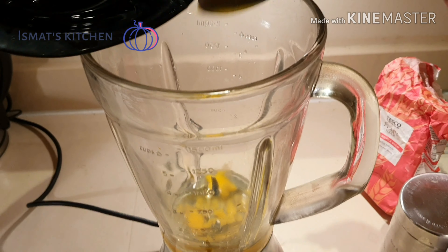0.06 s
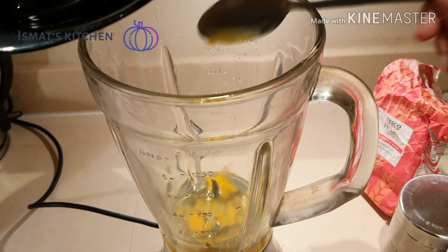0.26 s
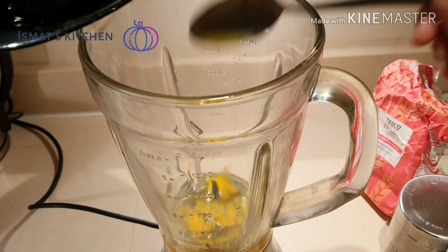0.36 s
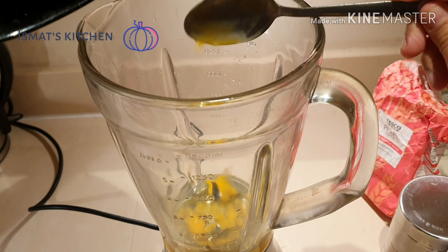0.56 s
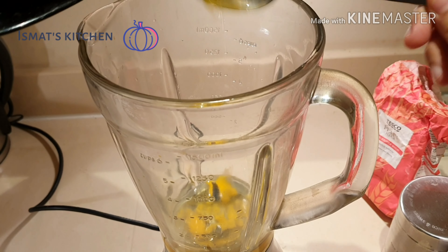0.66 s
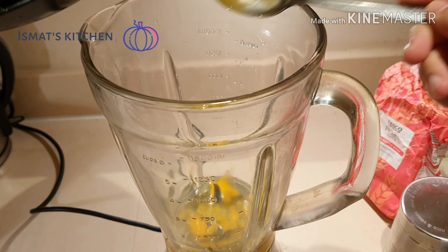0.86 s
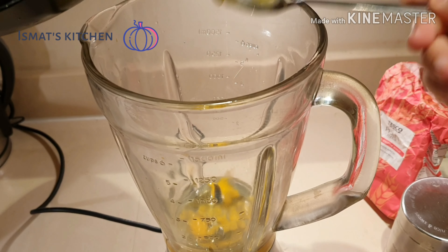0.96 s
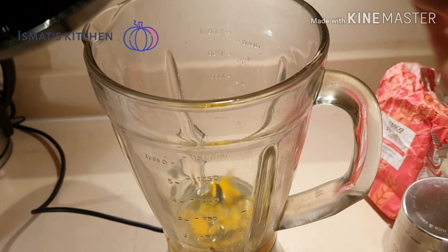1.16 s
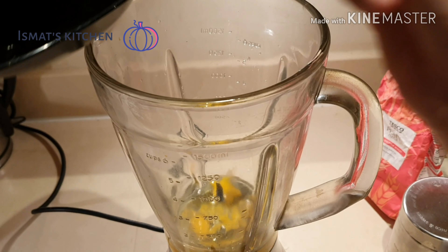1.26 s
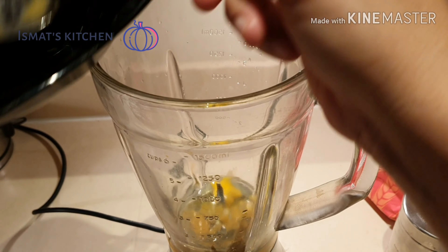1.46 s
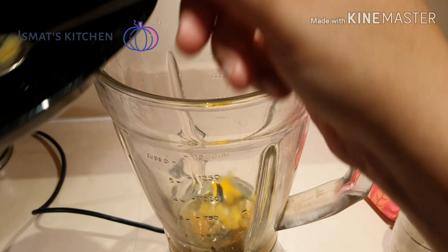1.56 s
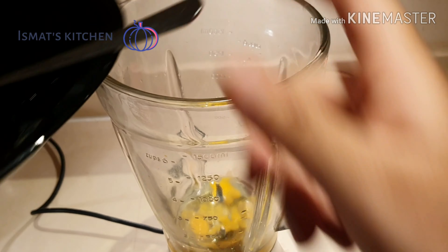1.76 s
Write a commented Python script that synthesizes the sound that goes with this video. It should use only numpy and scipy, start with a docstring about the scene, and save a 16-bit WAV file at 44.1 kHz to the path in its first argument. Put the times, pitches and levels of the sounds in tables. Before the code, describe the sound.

A metal spoon taps a glass blender jar rim four times, then a bowl clinks lightly twice

```python
"""A small hard kitchen: a spoon taps the rim of a glass blender jar four times, then touches a bowl twice.
Glass and bowl are banks of dying sines with beating twins, over a bright crack and clatter of shaped noise.
A low pop of the air in the jar and a thump of the counter sit under each contact, bowl included.
Behind them lie room air, an appliance's hum, two hand ticks and a faint whistle as the spoon is drawn off."""
import sys
import numpy as np
from scipy import signal
from scipy.fft import rfft, irfft
from scipy.io import wavfile
from scipy.ndimage import uniform_filter1d

SR = 44100
rng = np.random.default_rng(int(sys.argv[2]) if len(sys.argv) > 2 else 0)


def materialize(psi):
    """Save the field psi as 16-bit PCM at rate SR to the path in sys.argv[1].

    A 1-D psi becomes a single channel; in a 2-D psi each row is a channel.
    """
    bounded = np.clip(np.atleast_2d(psi).T, -1, 1)
    quanta = np.round(bounded * 32767).astype(np.int16)
    wavfile.write(sys.argv[1], SR, quanta)


def volts_from_db(level):
    """Convert decibel levels to linear amplitude ratios."""
    exponent = np.asarray(level, float) / 20
    return 10 ** exponent


N = 79380
LEAD = SR // 10  # samples kept ahead of the start, for contacts whose tails are already sounding


def evened(x):
    """Scales to rms 1."""
    return x / np.sqrt(np.mean(x ** 2) + 1e-20)


def read(points, hz):
    """Reads a table on a log-frequency axis."""
    f, value = np.transpose(points)
    return np.interp(np.log(hz + 1), np.log(f + 1), value)


def tilt(hz, slope_db):
    """Gain of a slope in dB per octave about 3 kHz, flat below 500 Hz."""
    return volts_from_db(slope_db * np.log2(np.clip(hz, 500, None) / 3000))


def add(mix, s, sound):
    """Mixes a sound in at time s."""
    part = mix[:, LEAD + round(s * SR):][:, :sound.shape[-1]]
    part += sound[..., :part.shape[1]]


def blend(a, b, same):
    """Left and right spectra with a given likeness, from two independent ones."""
    return np.array([a, same * a + np.sqrt(1 - same ** 2) * b])


def noise(spectrum, same, count, slope_db=0):
    """Two channels of coloured noise at rms 1; same(hz) is their likeness."""
    hz = np.fft.rfftfreq(count, 1 / SR)
    a, b = rfft(rng.standard_normal((2, count)), axis=1)
    colour = volts_from_db(read(spectrum, hz)) * tilt(hz, slope_db)
    return evened(irfft(blend(a, b, np.clip(same(hz), -1, 1)) * colour, count))


def fuzzy(hz, width_hz, steady):
    """A tone at rms 1 whose height and phase wander: a steady part plus slow complex noise."""
    r = np.exp(-np.pi * width_hz / SR)
    wander = rng.standard_normal((N + SR, 2)) @ [1, 1j]
    for _ in range(2):
        wander = signal.lfilter([1], [1, -r], wander)
    wander = wander[SR:]  # the filters have settled
    carrier = np.exp(2j * np.pi * np.cumsum(hz * np.ones(N)) / SR)
    return evened(((steady + wander / wander.std()) * carrier).real)


def room_air():
    """The still room: broadband noise, strongest in the bass, unlike in the two channels in some bands."""
    # room air colour: f/Hz, relative level/dB
    air = [(15, -44.5), (30, -23), (50, -4.5), (70, -22.5), (100, -15), (160, -14.5), (300, -16.5),
           (560, -16), (1000, -20), (1500, -26), (2500, -34), (10000, -38.5), (15500, -44), (17000, -60.5)]
    # left-right likeness of the air: f/Hz, likeness (1 = alike)
    likeness = [(60, 0.92), (180, 0.34), (550, 1), (1650, 0.11), (4970, 0.46), (15000, 1)]
    return volts_from_db(-61.5) * noise(air, lambda hz: read(likeness, hz), count=N)


def hum():
    """An appliance: narrow, nearly steady lines, the same in both channels."""
    # hum lines: f/Hz, level/dB rms
    lines = [(50, -72), (100, -70), (355, -60.5), (947, -72)]
    return sum(volts_from_db(db) * fuzzy(hz, width_hz=1.1, steady=9) for hz, db in lines)


def whistle():
    """A faint fuzzy whistle as the spoon is drawn off: one wandering tone gliding in pitch and level."""
    # whistle path: t/s, f/Hz, level/dB rms
    path = [(0.94, 1404, -61), (0.991, 1494, -59), (1.04, 1429, -62.5), (1.09, 1480, -62),
            (1.2, 1480, -75.5)]
    t, (s, hz, db) = np.arange(N) / SR, np.transpose(path)
    tone = fuzzy(np.interp(t, s, hz), width_hz=160, steady=.5)
    return volts_from_db(np.interp(t, s, db, -140, -140)) * tone


def tick(treble_db, knock_db):
    """A thin click of dying high-passed noise, and a dull knock: a dying sine just after it."""
    click_hz, click_t60_s = 5000, 0.0096
    knock_hz, knock_t60_s, knock_after_s = 262, 0.024, 0.0012
    t = np.arange(SR // 10) / SR
    high_pass = signal.butter(1, click_hz, "high", fs=SR)
    click = signal.lfilter(*high_pass, rng.standard_normal(len(t)))
    click *= volts_from_db(treble_db - 60 * t / click_t60_s) * np.minimum(t / .001, 1)
    late = np.maximum(t - knock_after_s, 0)
    knock = np.sin(2 * np.pi * knock_hz * late) * volts_from_db(knock_db - 60 * late / knock_t60_s)
    return click, knock


def hand_ticks():
    """Small ticks of a hand, as ring, rest and low mixes; the ring mix stays empty."""
    # ticks: t/s, treble level/dB, knock level/dB
    ticks = [(0.1152, -43.5, -37.5), (1.402, -51.5, -74)]
    mixes = np.zeros((3, 2, N + LEAD))
    for s, *levels in ticks:
        click, knock = tick(*levels)
        add(mixes[1], s, click)
        add(mixes[2], s, knock)
    return mixes


def rings(modes, rise_s, slope_db=0, after=0, count=SR, next_s=np.inf):
    """Sines (f/Hz, level/dB, t60/s, left-right/dB, left leads/rad) that start from rest and die."""
    scatter_db = 1  # random spread of each mode's level
    twin_db, twin_split, twin_start = -18.5, 0.001, 2.5  # dB, share of f higher, radians
    damp_hz, damp_db, damp_s = 2600, -9.5, 0.007  # the next contact chokes the upper modes
    hz, db, t60, pan_db, lead = np.transpose(modes)
    clock = np.arange(count) / SR
    t = np.maximum(clock - after, 0)
    size = np.sqrt(2) * volts_from_db(db + scatter_db * rng.standard_normal(hz.shape)) * tilt(hz, slope_db)
    ports = np.array([size * volts_from_db(side * pan_db / 2) * np.exp(.5j * side * lead) for side in (1, -1)])
    swing = np.exp((2j * np.pi * hz - np.log(1000) / t60)[:, None] * t) * (1 - np.exp(-t / rise_s))
    # a weaker twin a little higher makes each mode swell and beat
    swing *= 1 + volts_from_db(twin_db) * np.exp(1j * (2 * np.pi * twin_split * hz[:, None] * t + twin_start))
    swing[hz > damp_hz] *= volts_from_db(damp_db * np.clip((clock - next_s) / damp_s, 0, 1))
    return (ports @ swing).imag


def thump(count):
    """The counter under a contact: a few low modes, each arriving a little late."""
    # counter modes: f/Hz, relative level/dB, t60/s, arrives after t/s
    counter = np.array([(57.58, -4, 0.36, .032), (95, -4.5, 0.14, .012), (111.18, -3, 0.052, .036),
                        (139, -5.5, 0.075, 0.0033)])
    modes = [(*mode[:3], .8, .15) for mode in counter]
    return rings(modes, rise_s=0.0057, after=counter[:, 3:], count=count)


def pop(count):
    """The air in the jar: a low, slowly starting, soon dying group of resonances."""
    # air modes: f/Hz, relative level/dB, t60/s
    air_modes = [(393, -1.5, .09), (426, -16.5, 0.13), (446.7, 6.5, 0.07), (469.6, -13.5, 0.34),
                 (230, -10, 0.062)]
    return rings([(*mode, -2.5, .3) for mode in air_modes], rise_s=0.0084, count=count)


def patchy(spectrum):
    """Gives a smooth spectrum random narrow peaks and valleys."""
    patch_db, patch_hz, grid_hz = 6.5, 115.5, 20
    hz = np.arange(20, SR / 2, grid_hz)
    rough = uniform_filter1d(rng.standard_normal(len(hz)), max(round(patch_hz / grid_hz), 1))
    return np.c_[hz, read(spectrum, hz) + patch_db * evened(rough)]


def clatter_noise(spectrum, slope_db):
    """Many weak short modes heard as noise: a brighter, shorter crack over a longer clatter."""
    rise_s, crack_t60_s, clatter_t60_s, clatter_db = 0.000095, 0.019, 0.12, 1  # dB against the crack
    crack_tilt_db = 23  # per octave brighter than the clatter
    t = np.arange(SR) / SR
    same = lambda hz: 0.18 + 0 * hz  # left-right likeness, equal at every frequency
    crack = noise(spectrum, same, count=SR, slope_db=slope_db + crack_tilt_db)
    clatter = noise(spectrum, same, count=SR, slope_db=slope_db)
    both = volts_from_db(-60 * t / crack_t60_s) * crack + volts_from_db(clatter_db - 60 * t / clatter_t60_s) * clatter
    return both * 2 * (1 - np.exp(-t / rise_s))


def blow(modes, spot, clatter, next_s, count, ring_db, clatter_db, pop_db, thump_db, slope_db):
    """One contact: ringing modes with the pop of the jar's air, crack and clatter, and the counter's thump."""
    struck = np.c_[modes[:, [0, 1 + spot]], modes[:, -3:]]
    ring = volts_from_db(ring_db) * rings(struck, 0.002, slope_db, count=count, next_s=next_s)
    rest = volts_from_db(clatter_db) * clatter_noise(clatter, slope_db)
    short = min(count, SR // 2)
    ring[:, :short] += volts_from_db(pop_db) * pop(short)
    return ring, rest, volts_from_db(thump_db) * thump(short)


def blows(taps, spots, modes, clatter):
    """All contacts on one object, as ring, rest and low mixes; each chokes the ring of the one before."""
    mixes = np.zeros((3, 2, N + LEAD))
    clatter = patchy(clatter)
    lasting = round(modes[:, -3].max() * SR * 2)  # twice the longest t60
    gaps = np.diff([row[0] for row in taps] + [np.inf])
    for (s, *levels), spot, gap in zip(taps, spots, gaps):
        count = min(N - round(s * SR), lasting)
        for mix, sound in zip(mixes, blow(modes, spot, clatter, gap, count, *levels)):
            add(mix, s, sound)
    return mixes


def bowl():
    """The bowl, touched twice with small bounces; two more contacts fall just before the start."""
    # bowl mode frequencies: f/Hz
    bowl_hz = [1810, 2220, 2283, 2600, 3100, 3150, 4200, 4900, 5190, 6900, 7455, 9055, 10560, 10830, 12200]
    # bowl modes: relative level/dB struck at spot 0, at spot 1, t60/s, left-right/dB, left leads/rad
    bowl_modes = [(0, -21.5, 0.18, -4, 4), (-3.5, -15, 0.24, -9.5, 4), (-6, -25.5, 0.16, -16.5, 2.8),
                  (-19, -4, 0.072, 5, 1.7), (0, 1.5, 0.12, 9, 4.6), (2.5, 0, 0.067, 5.5, 2),
                  (5, -4, 0.0996, 6, 1.38), (-26, -11, 0.19, 3.5, 1.5), (-14.5, -1.5, 0.11, 6.5, -1),
                  (2.5, -0.5, 0.04, 16, 4), (-22.5, -7, 0.082, 4.5, 2), (-7, -6, 0.13, 3.5, -0.85),
                  (-7, -16, 0.028, 2.5, 0.5), (0, 2.5, 0.032, 6.5, 1.5), (-1, -12, 0.07, -1, 4)]
    # contacts: t/s, ring level/dB, clatter level/dB, pop level/dB, thump level/dB,
    # brightness/dB per octave about 3 kHz
    touches = [(-.035, -43.5, -48.5, -61, -76, -0.5), (-.02, -39, -49.5, -61.5, -77, -2),
               (1.482, -28, -32, -37.5, -52, 0.5), (1.487, -39.5, -37, -40, -64, 5),
               (1.547, -41, -47, -56, -71, 1), (1.662, -36, -40.5, -59, -64, 1),
               (1.675, -44.5, -43.5, -55.5, -55, 2)]
    # spot touched by each contact: number
    touched = (0, 1, 0, 0, 0, 1, 1)
    # bowl clatter colour: f/Hz, relative level/dB
    colour = [(320, -61), (550, -22.5), (1250, -21), (2000, -8.5), (3100, -8), (4900, -11), (6000, -22),
              (6900, -13), (8910, -15.5), (15400, -19), (17000, -77)]
    return blows(touches, touched, np.c_[bowl_hz, bowl_modes], colour)


def jar():
    """The glass jar's rim: four clear taps and weaker contacts after them; each spot favours other modes."""
    # glass mode frequencies: f/Hz
    glass_hz = [930, 1033, 2225, 2382, 2904, 2918, 3430, 3590, 3655, 3720, 3785, 3993, 4003, 3860, 4472,
                4794, 5571, 6250, 6841, 6851, 7330, 7633, 9362, 9452, 9808, 12125, 12548, 13480]
    # glass modes: relative level/dB struck at rim spot 0, at spot 1, at spot 2, t60/s,
    # left-right/dB, left leads/rad
    glass_modes = [(-36.5, -30.5, -28, 1.5, -3, 1.9), (-21, -26.5, -19.5, 1.2, -7.5, 1.8),
                   (-21, -26.5, -28.5, 0.45, -10, -1.5), (-35.5, -30, -10, 0.47, -4.5, 7),
                   (-5.5, -9.5, -6.5, 0.29, -7, -1.45), (-7.5, -18, -11.5, 0.28, 2, -3),
                   (-20, -10.5, -24, 0.065, -0.5, 1), (-13.5, -8, -28, 0.12, -0.5, 2),
                   (-7, -7.5, -19, 0.12, -4, 2), (-7, 0, -24.5, 0.16, -6, 2.5),
                   (1.5, 1, -15.5, 0.06, -5.5, 1), (1, -14.5, -8.5, 0.18, 5.5, 1),
                   (-10, -16, -26.5, 0.16, 0.5, -5.3), (-1, 2, -28.5, 0.13, 1.5, 3),
                   (-7.5, -44.5, -6, 0.14, -4, 0.4), (-25.5, -14, -22, 0.17, -5.5, -2.5),
                   (-25, -8.5, -12.5, 0.09, 3.5, 1.0), (-4.5, -21, 1.5, 0.023, 2.5, -0.3),
                   (-14, -16.5, -17, 0.4, 4, -6), (-4, -11, -10, 0.26, 7.5, 0.5),
                   (-20.5, -20, -43.5, 0.27, -1.5, 3.5), (-10.5, -10.5, -29.5, 0.099, 3, -2.5),
                   (-18.5, -17.5, 4, 0.041, 5, 1.5), (-1, 1.5, -25, 0.09, 3.5, 0.73),
                   (-11, -13, -28, 0.18, -0.5, -1.5), (-20, -7.5, -4.5, 0.033, -4.5, -1.5),
                   (-11, -23, -35, 0.042, -3, 3.5), (-10, -5.5, -3, 0.041, 1, 4)]
    # contacts: t/s, ring level/dB, clatter level/dB, pop level/dB, thump level/dB,
    # brightness/dB per octave about 3 kHz
    rim_taps = [(.2335, -17.5, -23.5, -25, -33, 2.5), (.437, -16.5, -28, -25.5, -37.5, 2.5),
                (.592, -19.5, -25.5, -24, -34, 3), (.769, -17, -25, -22.5, -34.5, 2.5),
                (.809, -32.5, -34.5, -50.5, -65, 0), (.921, -42, -48.5, -41, -58, -11),
                (.935, -53, -50.5, -56, -47, -12.5)]
    # rim spot struck by each contact: number
    rim_spots = (0, 1, 1, 2, 0, 1, 0)
    # glass clatter colour: f/Hz, relative level/dB
    colour = [(320, -61), (550, -42), (1350, -31.5), (2200, -17), (2650, -18.5), (3700, -11.5), (4500, -14),
              (5150, -20), (6500, -9), (7500, -19.5), (8300, -26.5), (9700, -18.5), (13300, -20.5),
              (14200, -21.5), (16000, -42), (17200, -57.5)]
    return blows(rim_taps, rim_spots, np.c_[glass_hz, glass_modes], colour)


def room(x):
    """Sparse echoes of random sign, each band dying at its own speed, the bass alike in both channels."""
    # reverberation: f/Hz, t60/s, left-right likeness (1 = alike)
    decay = np.array([(100, .3, 1), (450, 0.65, 1), (2000, 0.36, 0.77), (5130, 0.35, .2), (9600, 0.3, 0.15),
                      (15000, 0.16, 0.1)])
    start_s = .004
    taps = np.zeros((2, SR))
    at = np.arange(0, SR - 20, 20) + rng.integers(0, 20, (2, (SR - 1) // 20))  # one in every 20 samples
    np.put_along_axis(taps, at, rng.choice([-1., 1.], at.shape), 1)
    hz, t, bands = signal.stft(taps, SR, nperseg=256)
    same = np.clip(read(decay[:, ::2], hz), 0, 1)[:, None]
    t60 = read(decay[:, :2], hz)[:, None]
    bands = blend(bands[0], bands[1], same) * volts_from_db(-60 * t / t60)
    tail = signal.istft(bands, SR, nperseg=256)[1]
    tail = np.pad(tail / np.linalg.norm(tail[0]), ((0, 0), (round(start_s * SR), 0)))
    return signal.fftconvolve(x, tail, axes=1)[:, :x.shape[1]]


def scene():
    """Jar, bowl and hand with the room's answer, over the background; low knocks and thumps stay dry."""
    ring, rest, low = jar() + bowl() + hand_ticks()
    wet = room(volts_from_db(-13) * ring + volts_from_db(-2) * rest)
    background = room_air() + hum() + whistle()
    return (ring + rest + low + wet)[:, LEAD:] + background


def low_pass(x):
    """Removes everything above the highest recorded frequency."""
    return signal.sosfilt(signal.butter(12, 17160, fs=SR, output="sos"), x)


def record(dry):
    """The last step between the finished mix and the file; no gain is applied ahead of it."""
    return low_pass(dry)


dry = scene()
out = record(dry)
materialize(out)
```